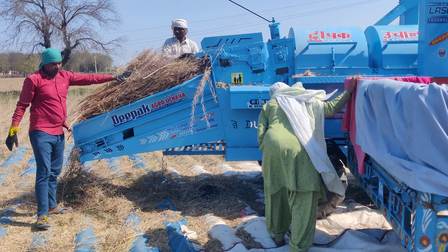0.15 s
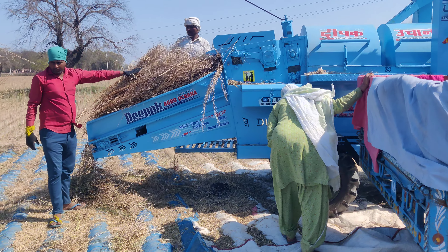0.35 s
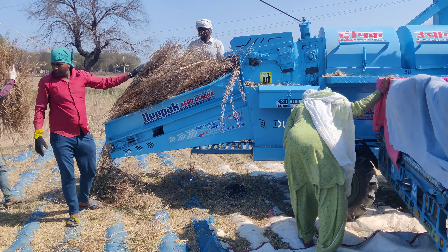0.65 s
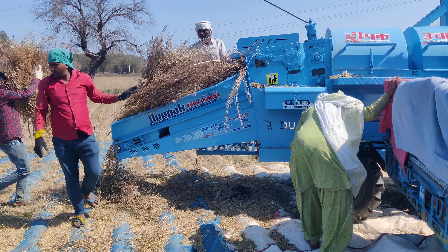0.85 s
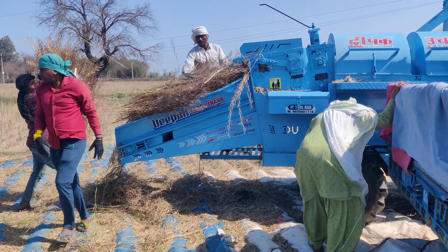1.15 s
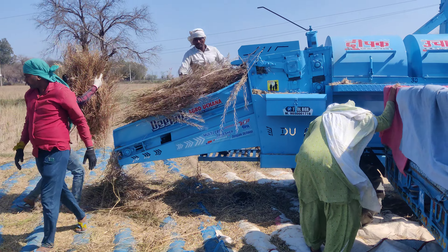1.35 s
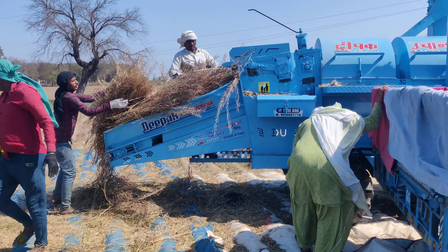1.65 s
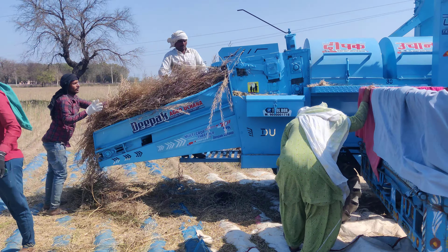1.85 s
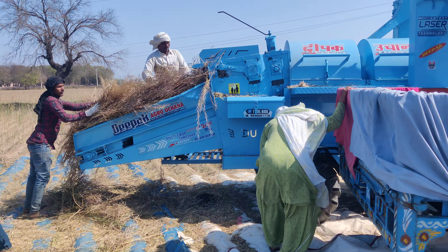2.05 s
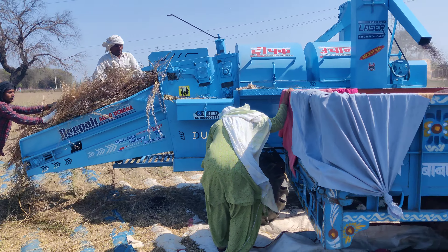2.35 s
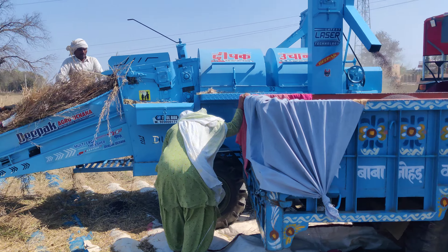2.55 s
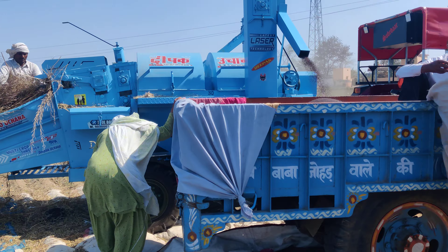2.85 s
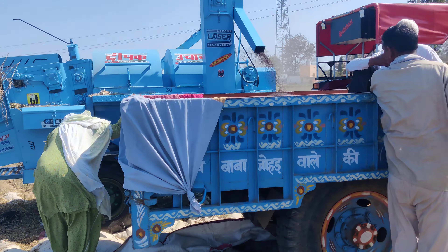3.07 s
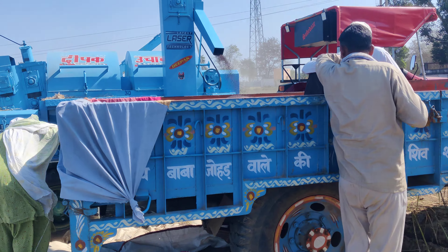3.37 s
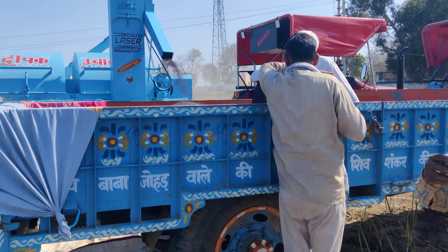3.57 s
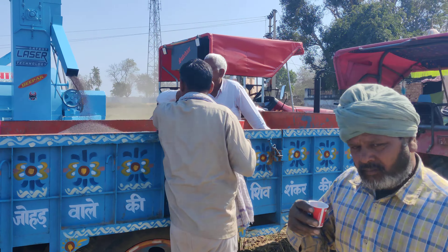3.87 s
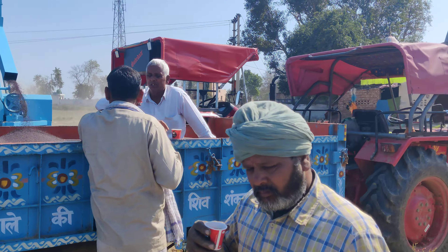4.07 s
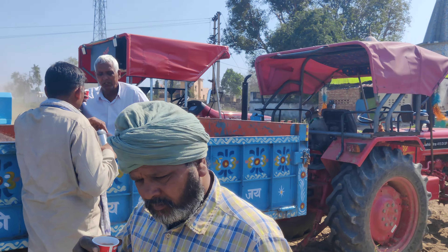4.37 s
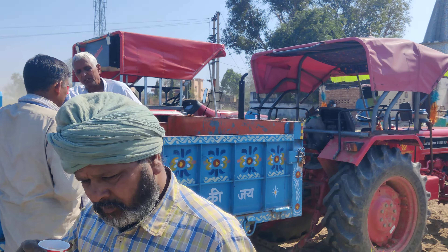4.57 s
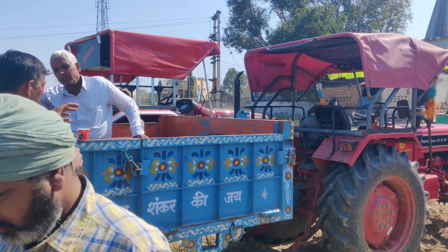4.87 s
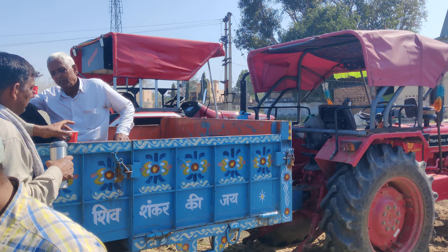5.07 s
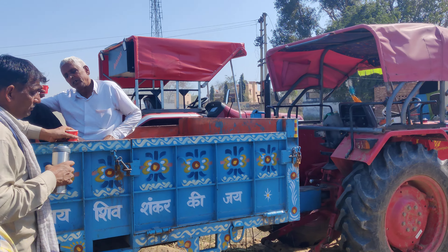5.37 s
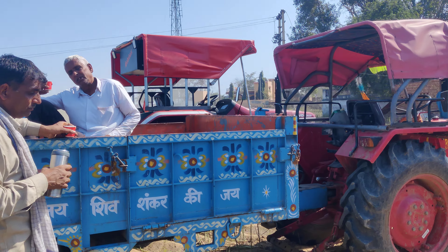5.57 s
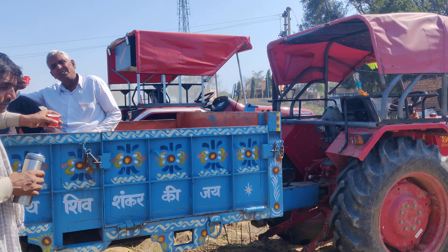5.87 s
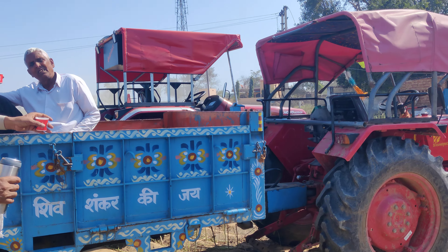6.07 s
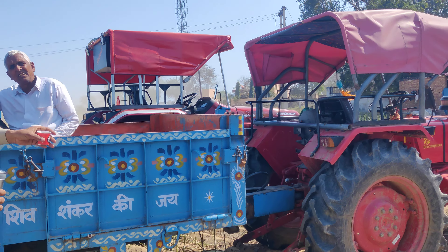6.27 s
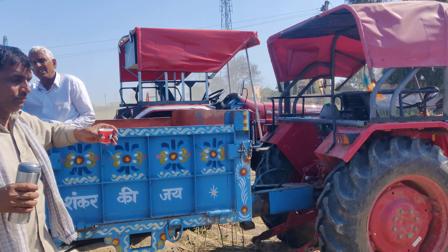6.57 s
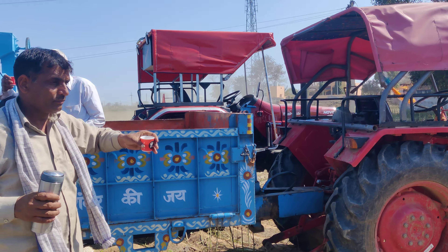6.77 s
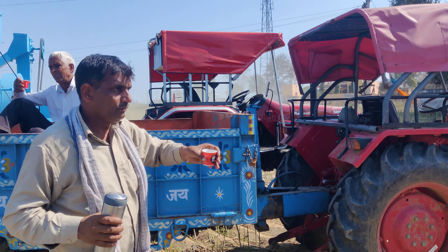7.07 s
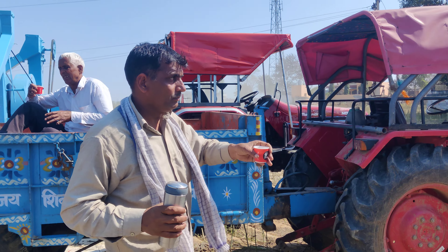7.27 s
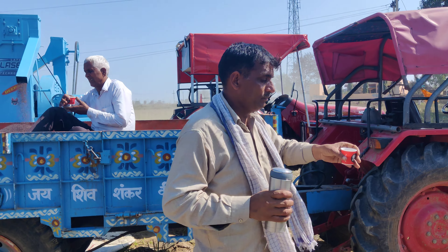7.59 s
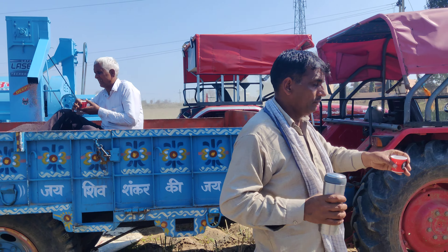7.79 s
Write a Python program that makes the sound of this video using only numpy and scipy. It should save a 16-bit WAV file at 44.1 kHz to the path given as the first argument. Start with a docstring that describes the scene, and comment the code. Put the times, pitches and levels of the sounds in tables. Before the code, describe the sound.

In an open field a tractor powers a crop thresher without pause. A deep diesel hum beats against the drum's drone, beneath fan roar, rattling straw, rushing chaff and bright grain hiss. The handheld stereo microphone moves from the feed chute along a trailer, so tone and sides shift and the roar grows duller. Gusts buffet it, hardest near the end. No voices are heard.

```python
"""A throbbing hum under a bright, dusty rush: a tractor drives a crop thresher in an open field.
Diesel and threshing drum are stacks of sine lines at nearby pitches that throb against each other.
Fan roar, beaten straw, rushing chaff, hissing grain and faint treble crackle are coloured noise and clicks.
The microphones turn from the feed chute and are carried along a trailer, so levels, tone and stereo shift.
Gusts are low noise and pressure shoves on the microphones; a limiter ducks the sound under them."""
import sys
import numpy as np
from scipy import signal
from scipy.fft import rfft, irfft
from scipy.io import wavfile
from scipy.ndimage import uniform_filter1d, minimum_filter1d

SR = 44100
rng = np.random.default_rng(int(sys.argv[2]) if len(sys.argv) > 2 else 0)


def log_audio(samples):
    """Write samples as a 16-bit WAV file to the path given in sys.argv[1]."""
    # one column per channel
    frames = np.atleast_2d(samples).T
    # limit to full scale, then quantise
    limited = np.clip(frames, -1, 1)
    pcm = np.round(limited * 32767).astype(np.int16)
    wavfile.write(sys.argv[1], SR, pcm)


N = 349713
TIME = np.arange(N) / SR

# Lines of the four-cylinder diesel, which fires twice a turn.
# Each row: multiple of the crankshaft speed, relative level in dB.
ENGINE_LINES = [(2, -0.7), (3, -17.5), (4, -7), (5, -23.5), (6, -17.5), (8, -18), (10, -21.5), (12, -24),
                (14, -28)]
# Low thrum, hum and rough beater-bar overtones of the drum.
# Each row: multiple of the drum speed, relative level in dB.
THRUM_LINES = [(4, -1.5)]
HUM_LINES = [(6, -9), (8, 0)]
GROWL_LINES = [(42, -1.5), (48, -3.5), (54, -2), (60, -2.5), (66, -0.5), (72, -5), (78, -4.5), (90, -6.5)]
# Upper casing lines, each swelling as the microphones pass through its lobe.
# Each row: multiple of the drum speed, relative level in dB, loudest moment in seconds,
# length of the swell in seconds, extra level at its peak in dB.
DRONE_LINES = [(12, -13, 3.33, 3, 9.5), (18, -17.5, 5.1, 2, 10), (24, -11.5, 2.07, 5.2, 7.5),
               (26, -21.5, 2.57, 1.5, 12), (30, -15, 2.15, 9.3, 4.5), (36, -17.5, 3.13, 2.47, 9)]

# Tone of the fan, beaten straw, chaff, grain, treble crackle and wind.
# Each row: frequency in Hz, relative level in dB per Hz.
ROAR_SPECTRUM = [(30, -42), (55, -2), (80, 2.5), (110, -3.5), (160, -3.5), (230, -5.5), (310, -4),
                 (420, -9), (500, -19.5), (650, -26.5), (1200, -53.5)]
BEATING_SPECTRUM = [(300, -39), (500, -12.5), (620, 1), (730, 0.5), (760, 1), (795, -1), (930, -1.5),
                    (1200, -7.5), (1700, -23), (3500, -46.5)]
CHAFF_SPECTRUM = [(600, -15.5), (1000, 0), (1300, -2.5), (1600, 0.5), (2000, -1), (2500, -1), (3200, -3.5),
                  (4000, -4.5), (5500, -57), (8000, -51)]
GRAIN_SPECTRUM = [(1500, -59), (3000, -7.5), (3800, -2), (4500, 0.5), (5200, 1), (5900, 0), (6400, -6),
                  (6900, -15.5), (7400, -20.5), (8500, -37), (14000, -51)]
CRACKLE_SPECTRUM = [(3000, 4), (6000, -8), (7400, 5), (9500, 10), (13500, 5), (15000, -16)]
WIND_SPECTRUM = [(4, 5), (12, 3), (25, -3.5), (42, 5.5), (60, -7), (100, -7), (250, -24.5), (900, -73)]

# Bearing of the machine. Each row: time in seconds, lead of the left microphone in ms (scaled per source).
BEARING = [(0, -0.00023), (1.2, -0.065), (2.3, 0.08), (3.3, 0.32), (4.1, 0.53), (4.6, 0.49), (5.3, 0.46),
           (6.1, 0.49), (6.9, 0.48), (7.9, 0.3)]
# Likeness of the two channels, in general and with the machine in line with both microphones.
# Each row: frequency in Hz, likeness from 0 to 1.
LIKENESS = [(40, 0.93), (140, 0.98), (300, 1), (550, 0.66), (900, 0.68), (2000, 0.15), (3200, 0.3),
            (5000, 0.11), (12000, 0)]
LIKENESS_IN_LINE = [(40, 1), (140, 1), (300, 0.84), (550, 0.82), (1150, 1), (2000, 0.14), (3200, 0.99),
                    (4000, 0.31), (5400, 0.4), (12000, 0)]
# Left-right tilts, blended by how far aside the machine is: the front one is weighted from 0.5 down to -0.5,
# the side one from 0 to 1. Each row: frequency in Hz, left minus right in dB at weight 1.
FRONT_TILT = [(60, -8), (200, -0.5), (400, -2.2), (750, 4.5), (1200, -3.5), (1800, 0), (2500, -4),
              (3250, -1.5), (3900, -3), (4900, -2), (5500, 4.5), (6100, 11.5), (9400, 8.5), (13500, 6)]
ASIDE_TILT = [(60, -3), (200, 2.5), (400, -0.5), (750, -1.5), (1200, -2.5), (1800, -6), (2500, -7.5),
              (3250, -1.5), (3900, -8), (4900, -10.5), (5500, -3), (6100, 2.5), (9400, 3), (13500, 7)]
# Tone change past the trailer. Each row: frequency in Hz, change in dB with the machine fully aside.
TRAILER_SHADE = [(100, -3.5), (190, 1.5), (300, -3), (420, 0), (520, 5.5), (750, -7.5), (1000, -5.5),
                 (1300, 4.5), (1800, 0), (2500, 3), (3250, -1), (4000, -1), (5000, 0), (6000, 0.5),
                 (12000, -2)]
# Reflections from ground and steel panels. Each row: mean delay in ms, level in dB approached in the treble.
ECHOES = [(1.1, -13.5), (2.3, -10), (3.9, -15.5), (6.4, -19), (9.5, -44)]

# Moments when the drum casing or the fan is in the clear.
# Each row: centre in seconds, length in seconds, change in fan roar in dB, change in beating in dB.
IN_THE_CLEAR = [(2.5, 1.4, 0, 1.5), (3.25, 1.2, 0.5, 0), (7.18, 1.13, -2.5, 3)]
# Brief flickers in level of the beating, chaff and grain noise.
# Each row: centre in seconds, length in seconds, change in beating in dB, in chaff in dB, in grain in dB.
FLICKERS = [(0.123, 0.04, 4.5, 3, 0), (0.57, 0.04, -6, -3, 1.5), (0.766, 0.03, 2, 1, 0),
            (1.07, 0.053, 3, 2, 0.5), (2.057, 0.044, 4, 0, -2), (2.7, 0.11, 2, 0, 1),
            (2.875, 0.12, 5.5, -0.5, 1.5), (3.637, 0.042, 2, 4, 2), (3.689, 0.04, 2, 0, 1.5),
            (3.87, 0.09, 1, 0, 1.5), (4.6, 0.11, 6, 1.5, 1), (5.325, 0.025, 0, -1, 4),
            (6.17, 0.045, 2, 3, 0), (6.965, 0.028, 2, 8, 5.5)]
# Wads of crop going through. Each row: start in seconds, length in seconds,
# change in chaff in dB, change in grain in dB.
WADS = [(0.987, 0.44, 0.8, 0.8), (2.006, 0.22, -0.2, 2.3), (2.6, 0.44, 1.5, 1.4), (3.1, 0.53, 0.5, 2),
        (3.6, 0.45, 1.5, 4), (4.147, 0.63, 1.5, 4.5), (4.755, 0.3, 0.5, 3.5), (5.75, 0.61, 1.3, 2.5),
        (6.44, 0.2, -1.5, 2.5), (6.863, 0.14, 1, 2)]
# Bright peak of the hiss, drifting in pitch and strength at set times.
# Each row: time in seconds, centre in Hz, boost in dB.
SHEEN = [(0, 5700, 2.5), (1.6, 5500, 5), (2.3, 5150, 2.5), (2.85, 5300, 4.5), (3.25, 4800, 4),
         (3.9, 4660, 2), (4.6, 5050, 3.5), (5.4, 5140, 3), (6.6, 5400, 3.5), (7.9, 5140, 4.5)]
# Gusts, before the left-right balance. Each row: centre in seconds, length in seconds,
# level of the eddies in dB, peak of the pressure shove in dB.
GUSTS = [(1.644, 1.1, -23, -35), (2.848, 0.22, -15, -27), (3.395, 1.4, -22, -30), (6.278, 0.13, -22, -1),
         (7.509, 1.3, -16.5, -7), (7.56, 0.21, -11, 0), (7.8, 0.25, -11, -1)]

# The governor hunts slowly: turns per second, swing in turns per second, period, moment of top speed
CRANK_PER_S, HUNT_PER_S, HUNT_PERIOD_S, FASTEST_S = 21.266, .085, 7, 5.3
# Turns of the drum, feed rotor and chaff blower per crankshaft turn
DRUM_GEARING, FEED_GEARING, BLOWER_GEARING, BLOWER_LAG_TURNS = .54404, .516, .978, .39
IN_STEP_S = .04  # a moment at which engine and drum push together
SIEVE_STROKES_PER_S = 4.0

# The move along the trailer, then each layer's base level: (dB by the feed chute, dB at the far end)
LEAVE_S, ARRIVE_S = 2.6, 7.9
ENGINE_DB, THRUM_DB, HUM_DB = (-15.5, -16), (-22.5, -24.5), (-30.5, -18.5)
DRONE_DB, GROWL_DB, ROAR_DB = (-23.5, -27.5), (-48, -57), (-22.5, -25)
BEATING_DB, CHAFF_DB = (-31.5, -31), (-33, -36.5)
GRAIN_DB, CRACKLE_DB = (-32, -34), (-58, -57.5)

WAD_EDGE_S = 0.17
BEATING_SHARE = 0.36  # how far the beating follows the wads' chaff level, dB per dB
SHEEN_WIDTH_HZ = 740
DULL_ABOVE_HZ, ROAR_DULL_DB = 295, -11  # the fan dulls by this many dB an octave at the far end
ASIDE_MS, IN_LINE_MS = 0.65, 0.48  # lead with the machine fully aside; lead above which it is in line
BREEZE_DB, SHOVE_S = -23, 0.0043  # steady wind before the left-right balance; centre to peak of a shove
SQUEEZE, USUAL_DB = .14, -13  # the compressor takes back this share of each dB away from the usual level
CEILING, LIMITER_ATTACK_S, RECOVER_DB_PER_S = .88, .045, 13
EDGE_HZ = 14500


def gain_of(db):
    """Decibels to gain."""
    return 10 ** (np.asarray(db) / 20)


def evened(x):
    """Scales to rms 1."""
    return x / np.sqrt(np.mean(x ** 2) + 1e-20)


def curves(rows, t):
    """Each column of a table, joined by straight lines in time."""
    s, *columns = np.transpose(rows)
    return [np.interp(t, s, column) for column in columns]


def read(points, hz):
    """A spectrum, joined by straight lines over log frequency."""
    f, value = np.transpose(points)
    return np.interp(np.log(hz + 1), np.log(f + 1), value)


def wander(rate_hz):
    """Smooth chance of rms 1, fading out above the given rate."""
    step = 100  # samples between points
    count = N // step
    hz = np.fft.rfftfreq(count, step / SR)
    slow = irfft(rfft(rng.standard_normal(count)) * np.exp(-(hz / rate_hz) ** 2))
    return evened(np.interp(TIME, np.arange(len(slow)) * step / SR, slow))


def cycle(turns):
    """One swell in every turn."""
    return np.cos(2 * np.pi * turns)


def swell(s, length):
    """A smooth rise to 1 and fall, centred on a moment."""
    return np.cos(np.pi * np.clip((TIME - s) / length, -.5, .5)) ** 2


def swells(rows):
    """Adds up passing swells; one level curve for each dB column of the table."""
    return sum(np.outer(levels_db, swell(s, length)) for s, length, *levels_db in rows)


def carried(ends_db, bend=1):
    """A level as the microphones are carried along the trailer; a bend above 1 delays the change."""
    near_db, far_db = ends_db
    progress = np.clip((TIME - LEAVE_S) / (ARRIVE_S - LEAVE_S), 0, 1)
    return near_db + (far_db - near_db) * progress ** bend


def impacts(per_s, spread_db):
    """Random clicks, many small and a few large."""
    size = gain_of(spread_db * np.minimum(rng.exponential(1, N), 4))
    struck = rng.random(N) < per_s / SR
    return evened(size * rng.standard_normal(N) * struck)


def stream(per_s, spread_db, share):
    """Air noise mixed with a share of impact energy, along two independent paths."""
    hits = np.array([impacts(per_s, spread_db), impacts(per_s, spread_db)])
    return np.sqrt(1 - share) * rng.standard_normal((2, N)) + np.sqrt(share) * hits


def spectrogram(x):
    """Splits sound into short overlapping frames: Hz as a column, frame times, spectra."""
    hz, t, frames = signal.stft(x, SR, nperseg=2048, noverlap=1536)
    return hz[:, None], t, frames


def reflections(hz, t):
    """Comb ripples at one microphone: delayed copies whose paths drift by chance, weaker in the bass."""
    response = 1
    for ms, db in ECHOES:
        path_s = (ms + 0.12 * np.interp(t, TIME, wander(0.76))) / 1000
        response = response + gain_of(db) * hz / (hz + 400) * np.exp(-2j * np.pi * hz * path_s)
    return response


def radiate(drives, spectrum, band, offside, ripples):
    """Colours two drives, with the spectrum's level set by its power within the band, and places them in
    stereo."""
    hz, t, (direct, scattered) = spectrogram(drives)
    colour = gain_of(read(spectrum, hz))
    colour /= np.sqrt(np.mean(colour ** 2 * (hz > band[0]) * (hz < band[1])))
    lead_ms, = curves(BEARING, t)
    aside = np.clip(lead_ms / ASIDE_MS, 0, 1)
    tilt = gain_of((0.5 - aside) * read(FRONT_TILT, hz) + aside * read(ASIDE_TILT, hz))
    same = np.where(lead_ms > IN_LINE_MS, read(LIKENESS_IN_LINE, hz), read(LIKENESS, hz))
    same = np.clip(same, 0, 1)
    delay = np.exp(-2j * np.pi * hz * offside * lead_ms / 1000)  # offside scales the bearing
    left = tilt * direct
    right = same * delay * direct + np.sqrt(1 - same ** 2) * scattered
    balance = np.sqrt(2 / (1 + tilt ** 2))  # tilting keeps the total power
    pair = np.array([left, right]) * ripples * colour * gain_of(aside * read(TRAILER_SHADE, hz)) * balance
    return signal.istft(pair, SR, nperseg=2048, noverlap=1536)[1][:, :N]


def shaft(turns, orders, waver, jitter, skew):
    """Sine lines at multiples of a shaft's speed, skew radians apart at the microphones.
    The strong ones keep in step; the weak ones come by many paths and waver most."""
    out = np.zeros((2, N))
    for order, db in orders:
        unsteady = gain_of(-db / 2)
        astray = np.clip(-db / 12 - .6, 0, 1) * rng.uniform(-np.pi, np.pi)
        angle = 2 * np.pi * order * turns + astray + np.array([[skew], [-skew]]) / 2
        in_phase = (1 + waver * unsteady * wander(4.1)) * np.cos(angle)
        sideways = jitter * unsteady * wander(8.5) * np.sin(angle)
        out -= gain_of(db) * (in_phase + sideways)
    return np.sqrt(2) * out


def wind():
    """Lumpy low eddies, partly common to both microphones; gust fronts pull, then push, the left one most."""
    strength, shoves = gain_of(BREEZE_DB), 0
    for s, length, eddies_db, shove_db in GUSTS:
        strength = strength + gain_of(eddies_db) * swell(s, length)
        u = (TIME - s) / SHOVE_S
        shoves = shoves + gain_of(shove_db) * u * np.exp((1 - u ** 2) / 2)
    eddies = rng.standard_normal((2, N)) + 0.14 * rng.standard_normal(N)
    colour = gain_of(read(WIND_SPECTRUM, np.fft.rfftfreq(N, 1 / SR)))
    lumps = evened(irfft(rfft(eddies) * colour, N)) * gain_of(2.0 * wander(5.1))
    return strength * lumps * gain_of([[2.5], [-4.5]]) + shoves * gain_of([[0], [-14]])


def diesel(crank):
    """Exhaust pulses as lines locked to the crankshaft, a touch to the left."""
    lines = shaft(crank, ENGINE_LINES, waver=0.024, jitter=0.016, skew=0.076)
    return gain_of(carried(ENGINE_DB)) * lines * gain_of([[.8], [-.8]])


def drum_casing(drum):
    """Air pulses of the drum as lines locked to its turning; a few hertz off the diesel, they throb with it."""
    casing = gain_of(carried(THRUM_DB)) * shaft(drum, THRUM_LINES, waver=.03, jitter=0.05, skew=-0.12)
    casing += gain_of(carried(HUM_DB)) * shaft(drum, HUM_LINES, waver=0.044, jitter=0.073, skew=-0.099)
    for order, db, s, length, lobe_db in DRONE_LINES:
        line = shaft(drum, [(order, db)], waver=0.026, jitter=0.06, skew=0.053)
        casing += gain_of(carried(DRONE_DB) + lobe_db * swell(s, length)) * line
    casing += gain_of(carried(GROWL_DB)) * shaft(drum, GROWL_LINES, waver=0.41, jitter=0.62, skew=0.6)
    return casing * gain_of([[.5], [-.5]])


def feed():
    """Changes in dB of chaff and of grain: each wad comes in quickly, holds and runs out."""
    changes_db = 0
    for s, length, *levels_db in WADS:
        from_edge_s = np.minimum(TIME - s, s + length - TIME)
        changes_db = changes_db + np.outer(levels_db, np.clip(from_edge_s / WAD_EDGE_S + .5, 0, 1))
    return changes_db


def fan_roar(crank, drum, bars, ripples):
    """Broad air noise, pulsing with exhaust chuffs, beater bars and drum turns; its top dulls with distance."""
    firings = cycle(2 * crank)
    air = rng.standard_normal((2, N)) * (1 + 0.16 * firings + 0.07 * bars + 0.019 * cycle(drum))
    hz, t, _ = spectrogram(TIME)
    dull_db = np.interp(t, TIME, carried((0, ROAR_DULL_DB), bend=3.9))
    dulling = gain_of(dull_db * np.log2(np.maximum(hz / DULL_ABOVE_HZ, 1)))
    return radiate(air, ROAR_SPECTRUM, (100, 500), 0.37, ripples * dulling)


def beaten_straw(bars, bites, ripples):
    """Noise and blows, pulsing with the beater bars and the bites of the feed rotor."""
    straw = stream(1200, 2.0, 0.087) * (1 + 0.06 * bars + 0.11 * bites + 0.12 * wander(26))
    return radiate(straw, BEATING_SPECTRUM, (520, 1200), 0.61, ripples)


def chaff_rush(puffs, bites, unevenness, ripples):
    """Noise and light impacts, thrown out in blower puffs and feed bites."""
    chaff = stream(1700, 2.2, 0.26) * (1 + 0.085 * puffs + 0.045 * bites + 0.11 * unevenness)
    return radiate(chaff, CHAFF_SPECTRUM, (1250, 3600), 0.93, ripples)


def grain_hiss(puffs, unevenness, ripples):
    """Dense tiny impacts over shaking sieves; the hiss has a bright peak that drifts at set times."""
    strokes = cycle(SIEVE_STROKES_PER_S * TIME)
    chance = 0.024 * unevenness + 0.078 * wander(18)
    grain = stream(3000, 2.6, 0.22) * (1 + 0.077 * puffs + 0.017 * strokes + chance)
    hz, t, _ = spectrogram(TIME)
    sheen_hz, sheen_db = curves(SHEEN, t)
    sheen = gain_of(sheen_db * np.exp(-((hz - sheen_hz) / SHEEN_WIDTH_HZ) ** 2))
    return radiate(grain, GRAIN_SPECTRUM, (3600, 7000), 1.0, ripples * sheen)


def treble_crackle(ripples):
    """Faint, uneven treble crackle: noise and sparse clicks, bunched by fast random swells."""
    crackle = stream(230, 4.0, 0.057) * gain_of(1.9 * wander(30))
    return radiate(crackle, CRACKLE_SPECTRUM, (8000, 14000), 0.36, ripples)


def thresher(crank, drum):
    """Rushes of air and small impacts, paced by the turning parts and swelling with the crop."""
    wad_chaff_db, wad_grain_db = feed()
    flicker_beating_db, flicker_chaff_db, flicker_grain_db = swells(FLICKERS)
    clear_roar_db, clear_beating_db = swells(IN_THE_CLEAR)
    bars = cycle(6 * drum)  # six beater bars
    bites = cycle(FEED_GEARING * crank)
    puffs = cycle(BLOWER_GEARING * crank - BLOWER_LAG_TURNS)
    unevenness = wander(26)  # uneven crop, shared by chaff and grain
    hz, t, _ = spectrogram(TIME)
    ripples = np.array([reflections(hz, t) for microphone in "LR"])

    roar_db = carried(ROAR_DB, bend=1.5) + clear_roar_db
    beating_db = carried(BEATING_DB) + BEATING_SHARE * wad_chaff_db + clear_beating_db + flicker_beating_db
    chaff_db = carried(CHAFF_DB) + wad_chaff_db + flicker_chaff_db
    grain_db = carried(GRAIN_DB) + wad_grain_db + flicker_grain_db
    crackle_db = carried(CRACKLE_DB) + wad_grain_db
    return (gain_of(roar_db) * fan_roar(crank, drum, bars, ripples)
            + gain_of(beating_db) * beaten_straw(bars, bites, ripples)
            + gain_of(chaff_db) * chaff_rush(puffs, bites, unevenness, ripples)
            + gain_of(grain_db) * grain_hiss(puffs, unevenness, ripples)
            + gain_of(crackle_db) * treble_crackle(ripples))


def scene():
    """One engine turns every shaft, so all the hums drift together; wind lies over the field."""
    speed = CRANK_PER_S + HUNT_PER_S * cycle((TIME - FASTEST_S) / HUNT_PERIOD_S)
    crank = np.cumsum(speed) / SR
    crank = crank - np.interp(IN_STEP_S, TIME, crank)
    drum = DRUM_GEARING * crank
    return wind() + diesel(crank) + drum_casing(drum) + thresher(crank, drum)


def record(dry):
    """A gentle compressor lets the rush swell in each lull of the throb; a limiter ducks gusts; treble is cut."""
    power = abs(uniform_filter1d((dry ** 2).mean(0), size=2048))
    level_db = 10 * np.log10(power + 1e-9)
    eased = dry * gain_of(-SQUEEZE * (level_db - USUAL_DB))
    over_db = 20 * np.log10(np.maximum(abs(eased).max(0) / CEILING, 1))
    # each overshoot holds the gain down, then lets it climb at the recovery rate
    recovery_db = RECOVER_DB_PER_S * TIME
    duck_db = recovery_db - np.maximum.accumulate(over_db + recovery_db)
    attack = round(LIMITER_ATTACK_S * SR)
    gain = gain_of(uniform_filter1d(minimum_filter1d(duck_db, size=attack), size=attack))
    low_pass = signal.firwin(511, EDGE_HZ, window=("kaiser", 9), fs=SR)
    return signal.oaconvolve(eased * gain, low_pass[None], "same")


dry = scene()
out = record(dry)
log_audio(out)
```